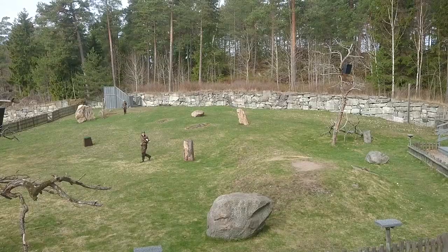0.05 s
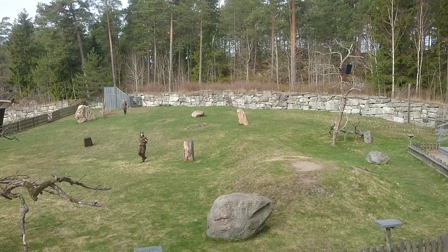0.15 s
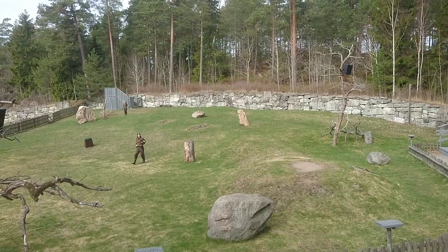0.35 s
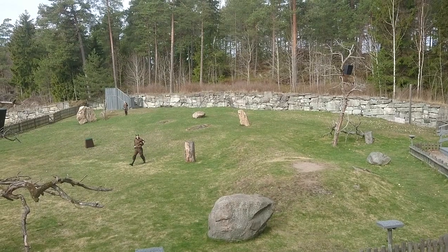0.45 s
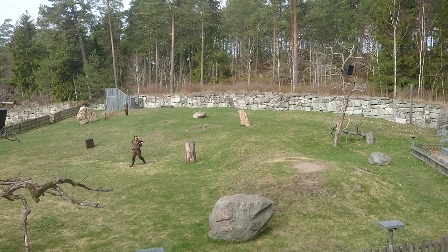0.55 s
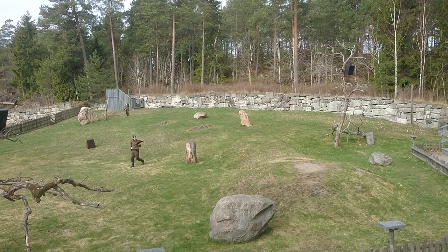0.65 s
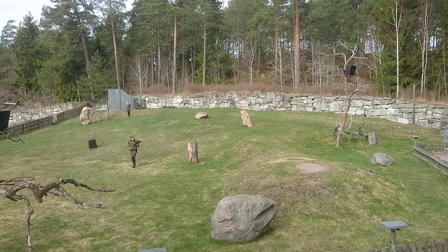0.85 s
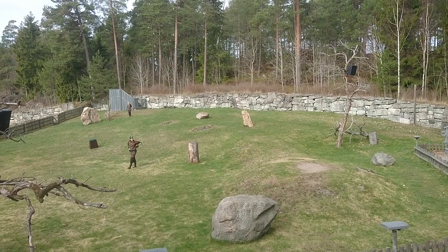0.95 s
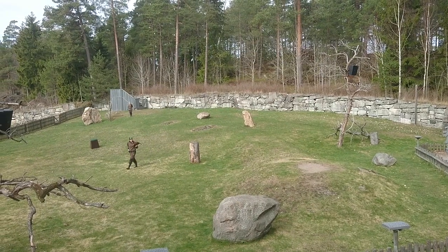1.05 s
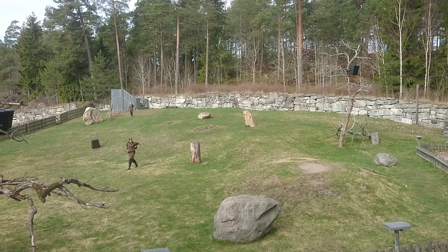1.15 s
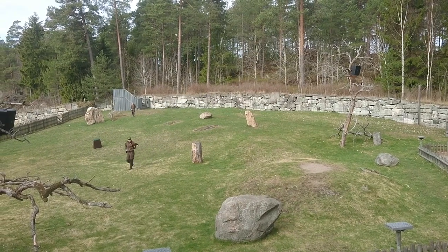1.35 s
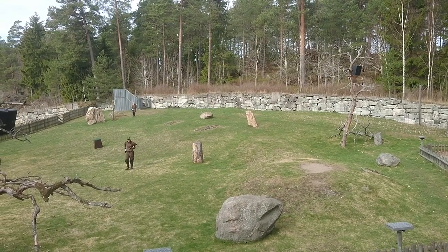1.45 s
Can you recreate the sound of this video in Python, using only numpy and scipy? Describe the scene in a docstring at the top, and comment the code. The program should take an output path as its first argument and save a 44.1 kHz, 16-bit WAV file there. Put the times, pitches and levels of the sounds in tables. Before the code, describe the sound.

A small bird on the right gives three thin, high whistles at about 0.2, 0.7 and 1.2 seconds, each short, level and trailing a light woodland echo. Very faint distant bird notes come at the start and near 1 second. Wind rumbles and thumps on the microphone, mostly left, strongest around 0.2, 0.6 and 1.2 seconds. A soft, steady hiss lies underneath.

```python
"""A lawn at the edge of a pine wood. A small bird on the right gives three thin, level whistles,
nearly pure tones that linger by reflection among the trunks; fainter notes come from other birds.
Light wind buffets the two microphone ports, and its fluctuating pressure is heard as low thumps.
Beneath it all lies a soft, steady hiss of broadband noise."""
import sys
import numpy as np
from scipy import signal
from scipy.fft import rfft, irfft
from scipy.io import wavfile
from scipy.ndimage import uniform_filter1d

SR = 44100
rng = np.random.default_rng(int(sys.argv[2]) if len(sys.argv) > 2 else 0)


def store_pcm(level_fs):
    """Save levels as 16-bit WAV."""
    pcm = np.round(np.clip(level_fs, -1, 1) * 32767).astype(np.int16)
    wavfile.write(sys.argv[1], SR, np.atleast_2d(pcm).T)


N = 66150
T = np.arange(N) / SR

# Spectrum of distant trees and hiss. Each row: frequency in Hz, relative spectral density in dB.
HISS_SPECTRUM = [(100, -2.5), (250, 1.5), (400, -2), (600, -6), (1000, -13.5), (1600, -16), (2800, -16.5),
                 (4200, -14.5), (5500, -14), (7700, -19.5), (12400, -18.5), (14500, -27), (15500, -24.5)]
# Spectrum of wind on a port. Each row: frequency in Hz, relative spectral density in dB.
RUMBLE_SPECTRUM = [(25, -53), (40, -8), (55, -1.5), (75, 5), (110, -5.5), (160, -19), (230, -32),
                   (320, -46.5), (500, -65), (900, -80)]
# Wind buffets. Each row: centre time in seconds, half width in seconds, level in dB,
# left minus right in dB, centre of the rumble in Hz.
EDDIES = [(0.033, 0.028, -40, 13.5, 62), (0.104, 0.016, -35.5, 31, 87.7), (0.198, 0.013, -33, 23, 106),
          (0.238, 0.018, -23.5, 26, 65.8), (0.313, 0.016, -43.5, 0, 56), (0.397, 0.0068, -31, 9, 87.5),
          (0.488, 0.019, -28.5, 14, 64.2), (.540, .014, -26.5, 7.5, 75), (.572, 0.018, -19, 23.5, 71),
          (0.628, 0.011, -27, -24, 95.5), (.670, 0.017, -40.5, -2, 56), (0.712, 0.052, -42.5, 14.5, 88),
          (0.773, 0.014, -44.5, 14, 80), (0.892, 0.033, -43, 9, 75), (.940, 0.017, -38, 17, 77.8),
          (1.038, 0.0066, -31.5, 7.5, 59.5), (1.078, 0.0082, -36, 11, 87), (1.14, 0.012, -28, 7.5, 76),
          (1.186, 0.013, -26, 25, 66), (1.245, 0.016, -29.5, 41, 62.2), (1.298, .010, -33, 26, 125),
          (1.322, 0.014, -36.5, 18, 62), (1.382, 0.021, -39.5, 9.5, 75), (1.466, 0.014, -34.5, -2.5, 77.7)]
# Sudden kicks on a port. Each row: centre time in seconds, half width in seconds,
# peak before filtering in dB, left minus right in dB.
PRESSURE_KICKS = [(.235, 0.0062, -19.5, 23), (.395, 0.0043, -29.5, 17), (.506, 0.0039, -15.5, -24),
                  (.568, 0.0053, -19.5, 22), (.630, 0.0038, -31.5, -14), (1.134, 0.0039, -31.5, 16),
                  (1.179, 0.0051, -20, 22), (1.299, 0.0042, -30.5, 20)]
# Notes of birds farther off. Each row: start in seconds, length in seconds, first and last pitch in Hz,
# level in dB, left minus right in dB, echo relative to the note in dB.
DISTANT_NOTES = [(.008, 0.036, 5680, 5530, -68.5, -17, -11), (0.035, .052, 5690, 5310, -73, -18, -20),
                 (0.053, 0.08, 4210, 4090, -78.5, -9, -6), (0.104, 0.054, 3960, 3804, -82.5, -2, -11),
                 (0.941, 0.076, 3563, 3565, -78, 9, -7)]
# The small bird's whistles. Each row: start in seconds, pitch in Hz, depth of the opening scoop in Hz.
WHISTLE_NOTES = [(.200, 5680, 140), (.695, 5733, 10), (1.215, 5678, 5)]
# The bird's effort, one list per whistle. Each row: time in seconds, relative level in dB.
WHISTLE_ENVELOPES = [
    [(.200, -67), (.212, -64.5), (.240, -63.5), (.258, -70.5), (.280, -58), (.310, -55.5), (.345, -63.5),
     (.395, -75)],
    [(.693, -78), (.708, -63.5), (.742, -62.5), (.782, -59), (.812, -71.5), (.840, -65), (.895, -67)],
    [(1.215, -72), (1.245, -68), (1.272, -61), (1.308, -77.5), (1.345, -61), (1.380, -73), (1.425, -70)],
]

HISS_DB, HISS_COHERENCE = -68.5, 0.069   # coherence: the share of power common to both sides
BREEZE_LEFT_DB, BREEZE_RIGHT_DB, BREEZE_SWING_DB = -50, -57, 3
RUMBLE_PEAK_HZ, PORT_BAND_HZ = 75, [38, 710]
WOOD_T60_S, FIRST_ECHO_S, ECHO_FLUTTER_DB = 1.3, .02, 4.5
SCOOP_S, SAG_HZ, EDGE_S = 0.039, 25.8, .008   # edge: the onset and release of a whistle
WHISTLE_GAIN_DB, WHISTLE_PAN_DB = -2, -17.5
WHISTLE_ECHO_DB, ECHO_PAN_DB = -8, -15


def from_db(db):
    """Amplitude ratio: tenfold for every 20 dB."""
    return 10 ** (np.asarray(db) / 20)


def rms_one(x):
    """Normalisation of each channel to rms 1."""
    return x / np.sqrt(np.mean(x ** 2, axis=-1, keepdims=True) + 1e-20)


def pan(db):
    """Constant-power panning: two gains for a level difference, left minus right."""
    gains = from_db([[db / 2], [-db / 2]])
    return gains / np.sqrt(np.sum(gains ** 2))


def coloured(spectrum, shift=1, channels=2):
    """Spectral shaping of independent white noises, rms 1; shift multiplies the frequencies."""
    hz, db = np.transpose(spectrum)
    bins = np.maximum(np.fft.rfftfreq(N, 1 / SR), 1)
    gain = from_db(np.interp(np.log(bins), np.log(hz * shift), db))
    return rms_one(irfft(rfft(rng.standard_normal((channels, N))) * gain, N))


def drift(rate_hz):
    """Random modulation: two independent low-passed noises, rms 1."""
    pole = np.exp(-2 * np.pi * rate_hz / SR)
    noise = rng.standard_normal((2, 2 * N))
    return rms_one(signal.lfilter([1], [1, -2 * pole, pole * pole], noise)[:, N:])


def hiss():
    """Partial coherence: each side has its own steady noise and a little of a shared one."""
    left, right, shared = coloured(HISS_SPECTRUM, channels=3)
    separate = np.sqrt(1 - HISS_COHERENCE) * np.array([left, right])
    return from_db(HISS_DB) * (separate + np.sqrt(HISS_COHERENCE) * shared)


def swirl(peak_hz, span_s=.019):
    """Turbulence as low noise of rms 1; division by its smoothed envelope evens out chance swells."""
    rumble = coloured(RUMBLE_SPECTRUM, shift=peak_hz / RUMBLE_PEAK_HZ)
    power = np.abs(signal.hilbert(rumble)) ** 2
    mean_power = uniform_filter1d(power, int(span_s * SR), axis=-1)
    return rms_one(rumble / np.sqrt(mean_power + 1e-6))


def wind():
    """Turbulent pressure is local, so eddies and sudden kicks strike mostly one port at a time."""
    breeze_db = [[BREEZE_LEFT_DB], [BREEZE_RIGHT_DB]] + BREEZE_SWING_DB * drift(rate_hz=9.3)
    pressure = from_db(breeze_db) * swirl(RUMBLE_PEAK_HZ)
    for centre, width, db, pan_db, hz in EDDIES:
        swell = from_db(db) * np.exp(-.5 * ((T - centre) / width) ** 2)
        pressure += pan(pan_db) * swell * swirl(hz)
    for centre, width, db, pan_db in PRESSURE_KICKS:
        offset = (T - centre) / width
        kick = (1 - 3 * offset ** 2) / (1 + offset ** 2) ** 3   # a peak between two shallow troughs
        pressure += pan(pan_db) * from_db(db) * rng.choice([-1, 1]) * kick
    port_response = signal.butter(3, PORT_BAND_HZ, "band", fs=SR, output="sos")
    return signal.sosfiltfilt(port_response, pressure)


def trunk_echoes(source, count=500):
    """Reverberation: many weak reflections, different for each side, flutter and decay exponentially."""
    delay = rng.random((2, count))   # seconds after FIRST_ECHO_S
    decay = from_db(-60 * delay / WOOD_T60_S)
    strength = rms_one(rng.standard_normal((2, count)) * decay) / np.sqrt(count)
    response = np.zeros((2, N))
    for side in (0, 1):
        response[side, ((FIRST_ECHO_S + delay[side]) * SR).astype(int)] = strength[side]
    flutter = from_db(ECHO_FLUTTER_DB * drift(rate_hz=120))
    return flutter * signal.fftconvolve(source[None], response, axes=1)[:, :N]


def tone(hz):
    """A sine of rms 1 whose phase is the integral of its frequency."""
    return np.sqrt(2) * np.sin(2 * np.pi * np.cumsum(hz) / SR)


def distant_birds(waver_hz=22.7):
    """Frequency modulation: short wavering glides, arriving directly and by reflection."""
    direct, into_wood = np.zeros((2, N)), np.zeros(N)
    waver = waver_hz * drift(rate_hz=68)[0]
    for start, length, first_hz, last_hz, db, pan_db, echo_db in DISTANT_NOTES:
        progress = np.clip((T - start) / length, 0, 1)
        pitch = first_hz + (last_hz - first_hz) * progress + waver
        note = from_db(db) * np.sqrt(np.abs(np.sin(np.pi * progress))) * tone(pitch)
        direct += pan(pan_db) * note
        into_wood += from_db(echo_db) * note
    return direct + trunk_echoes(into_wood)


def whistling_bird(waver_hz=6, flutter_db=.5):
    """Modulated pure tones and their echo: pitch scoops up, holds and sags; amplitude follows effort."""
    voice = np.zeros(N)
    for (start, hz, scoop_hz), envelope in zip(WHISTLE_NOTES, WHISTLE_ENVELOPES):
        times, effort_db = np.transpose(envelope)
        length = times[-1] - start
        age = np.clip(T - start, 0, length)
        waver, flutter = drift(rate_hz=100)
        scoop = scoop_hz * np.exp(-age / SCOOP_S)
        sag = SAG_HZ * (age / length) ** 4
        gate = np.minimum(np.minimum(age, length - age) / EDGE_S, 1)
        level_db = WHISTLE_GAIN_DB + np.interp(T, times, effort_db) + flutter_db * flutter
        voice += gate * from_db(level_db) * tone(hz - scoop - sag + waver_hz * waver)
    echo = from_db(WHISTLE_ECHO_DB) * pan(ECHO_PAN_DB) * trunk_echoes(voice)
    return pan(WHISTLE_PAN_DB) * voice + echo


def scene():
    """Superposition: the pressures of birds, wind and hiss add."""
    return whistling_bird() + distant_birds() + wind() + hiss()


def record(dry, cutoff_hz=15700):
    """Band limiting: a steep low-pass filter removes the highest treble."""
    return signal.sosfilt(signal.ellip(10, .1, 70, cutoff_hz, fs=SR, output="sos"), dry)


dry = scene()
out = record(dry)
store_pcm(out)
```